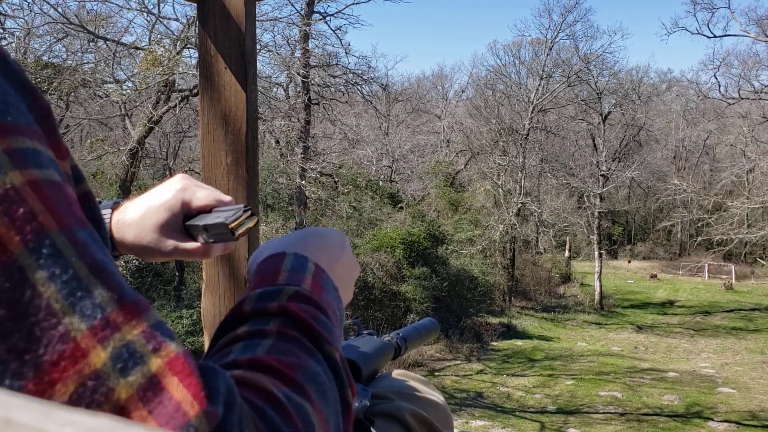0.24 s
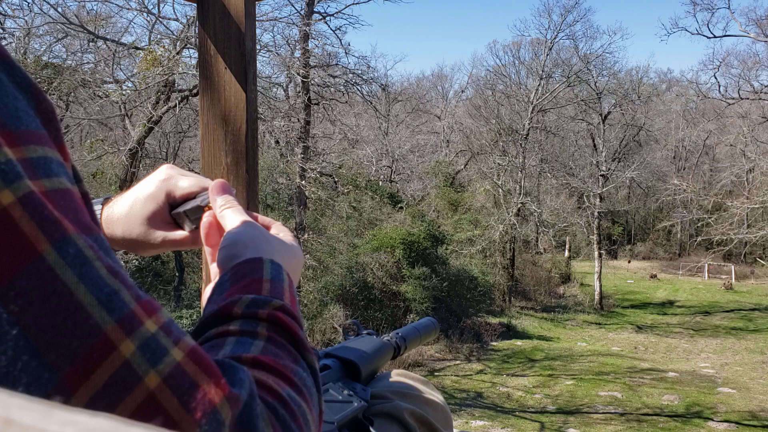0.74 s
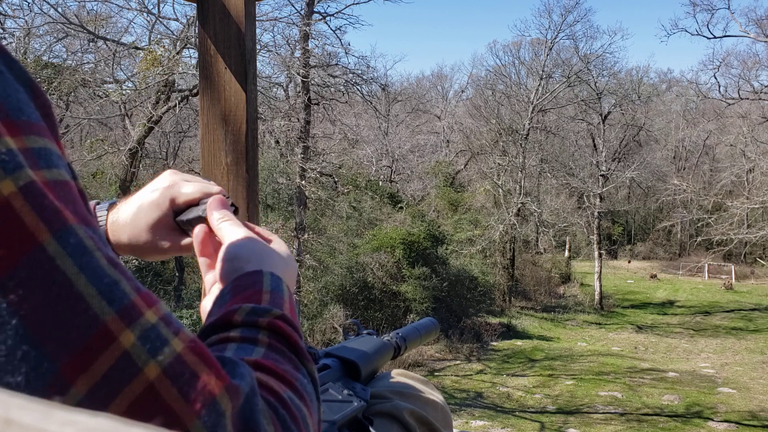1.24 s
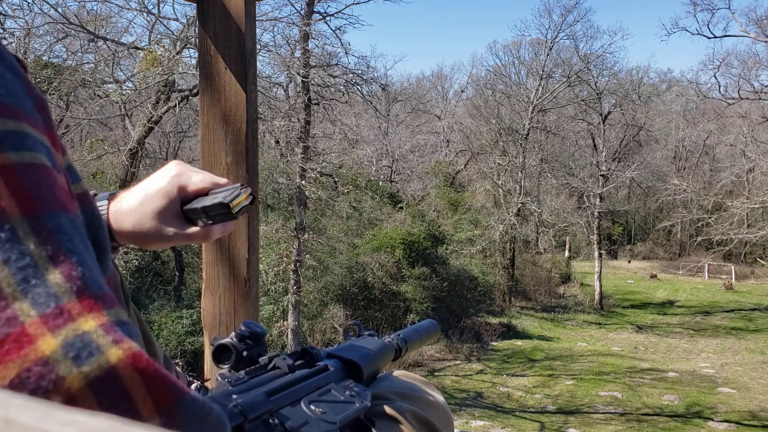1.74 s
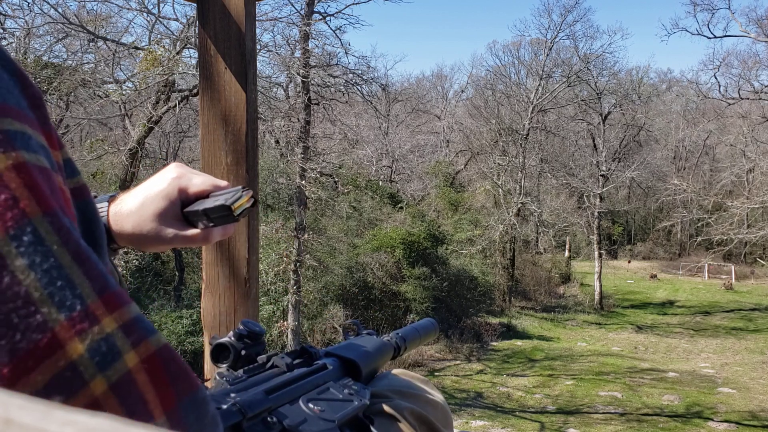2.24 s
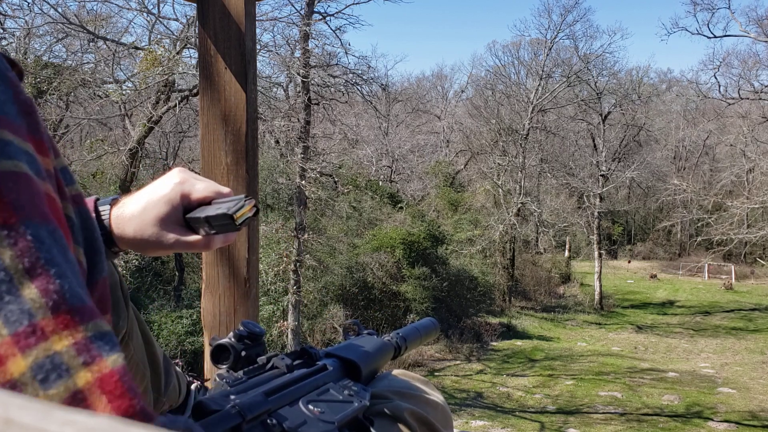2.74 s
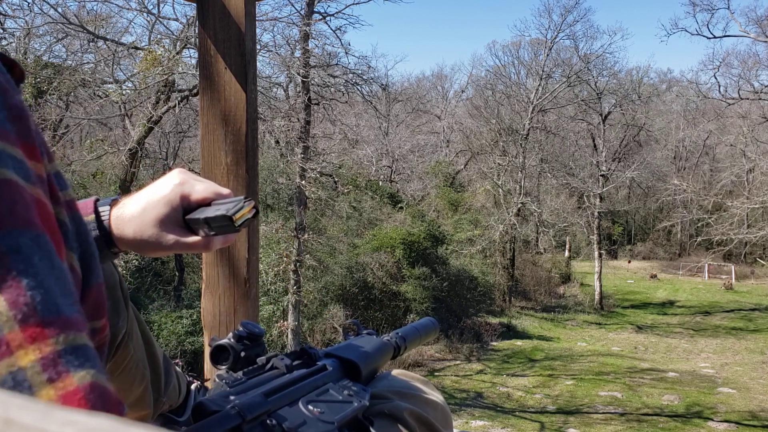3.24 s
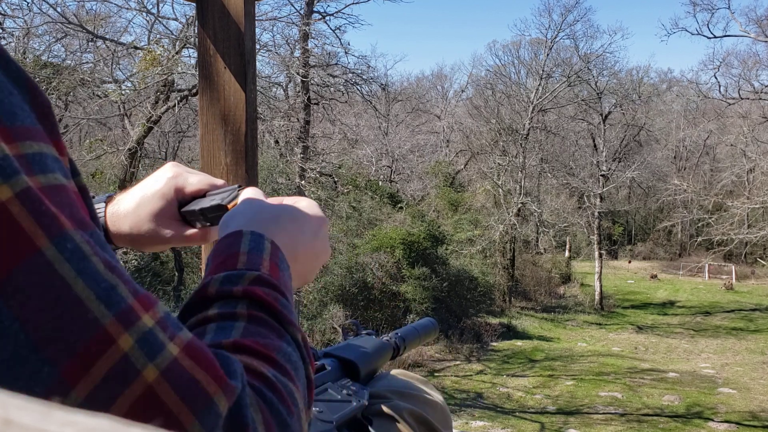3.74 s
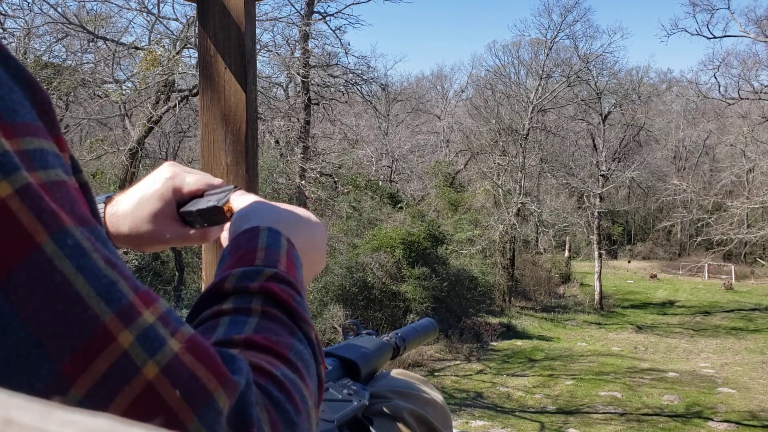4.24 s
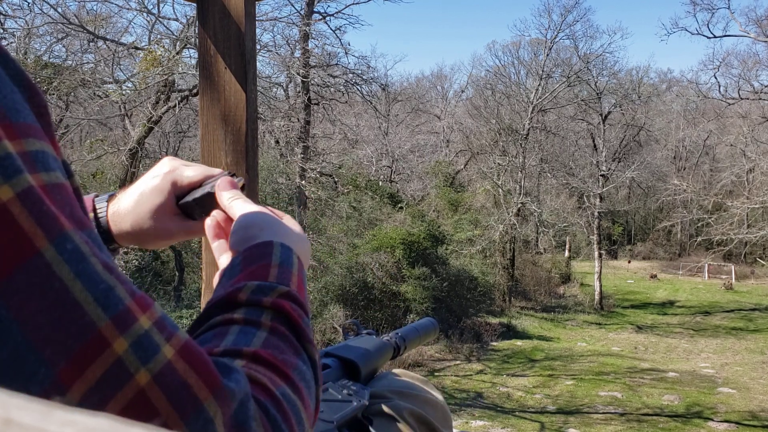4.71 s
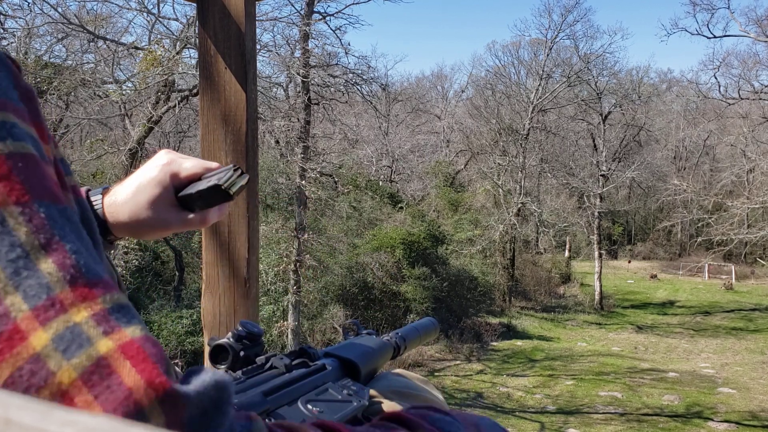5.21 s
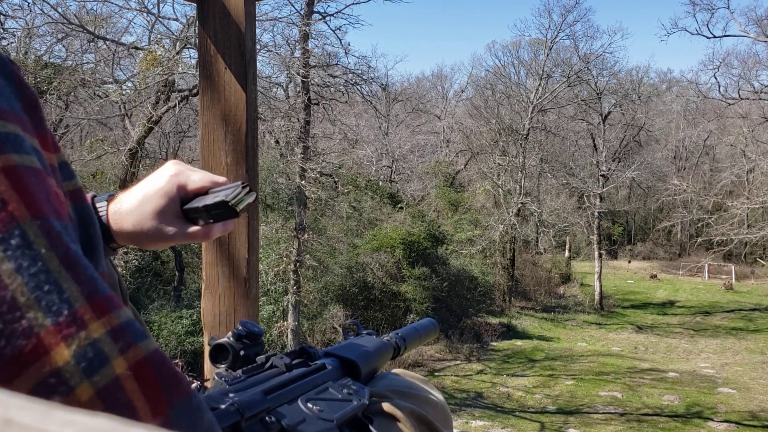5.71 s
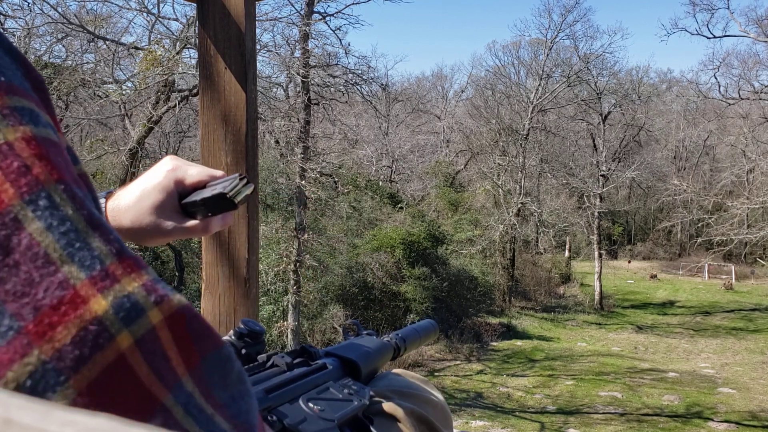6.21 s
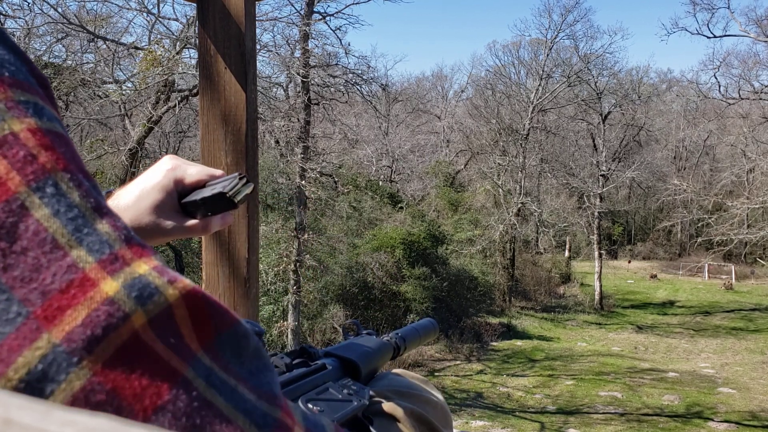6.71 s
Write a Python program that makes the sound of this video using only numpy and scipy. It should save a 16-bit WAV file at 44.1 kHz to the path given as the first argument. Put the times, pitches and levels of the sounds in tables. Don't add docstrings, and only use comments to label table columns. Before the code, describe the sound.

A close stereo outdoor scene, dry with only slight reflections from a post and trees. Low wind puffs flutter on the microphone, strongest in the first four seconds, over a faint wavering drone and leaf hiss. Small metallic clicks at 0.4 and 0.8 seconds lead to a sliding rub and a bright, hard snap with rapid bounces at 1.1. From 1.8 to 3.4 loose rounds knock in a hollow box, with a burst near 1.9 and the strongest clatter around 3.0, plus ticks, short scrapes and soft rustling. A crisp metal click comes at 3.6, lighter touches around 4.0, then a second seating snap at 4.77. Rummaging resumes from 5.5 to the end, with sharp knocks near 6.35 and small rattles at 6.8. A tiny high bird chips from the left about every second, clearest at 3.7 and 5.7.

```python
import sys
import numpy as np
from scipy import signal
from scipy.fft import rfft, irfft, next_fast_len
from scipy.io import wavfile
from scipy.ndimage import uniform_filter1d, map_coordinates

SR = 44100
rng = np.random.default_rng(int(sys.argv[2]) if len(sys.argv) > 2 else 0)


def makeup_ratio(level_db):
    decades = np.asarray(level_db, float) / 20
    return 10 ** decades


def file_out(sig):
    cols = np.atleast_2d(sig).T
    lim = np.clip(cols, -1, 1)
    pcm = np.round(lim * 32767).astype(np.int16)
    wavfile.write(sys.argv[1], SR, pcm)


N = 306832
LONG = next_fast_len(N + 2048)
BINS_HZ = np.fft.rfftfreq(LONG, 1 / SR)
LEFT_RIGHT = np.array([[1], [-1]])


def rms_one(x):
    return x / np.sqrt(np.mean(x ** 2) + 1e-20)


def in_time(rows):
    s, *columns = np.transpose(rows)
    return [np.interp(np.arange(N) / SR, s, c) for c in columns]


def at_hz(points, hz):
    points = np.array(points, float)
    return np.interp(np.log(hz), np.log(points[:, 0] + 1), points[:, 1])


def colour(x, spectrum):
    gain = makeup_ratio(at_hz(spectrum, BINS_HZ + 1))
    return irfft(rfft(x, LONG) * rms_one(gain), LONG)[..., :N]


def high_pass(x, hz):
    return signal.sosfilt(signal.butter(6, hz, "high", fs=SR, output="sos"), x)


def drift(rate):
    knots = rng.standard_normal(2000)
    steps = np.arange(0, N + 64, 64)
    return np.interp(np.arange(N), steps, map_coordinates(knots, [steps / SR * rate], order=2))


def swells(times, levels_db, rises_s, falls_s):
    steps = np.arange(0, N, 64)
    late = steps[:, None] / SR - times
    below = np.where(late > 0, late / falls_s, (late / rises_s) ** 2)
    power = makeup_ratio(2 * levels_db - 40 * below).sum(1)
    return np.interp(np.arange(N), steps, np.sqrt(power))


# time in seconds, peak in dB, length in seconds.
GUSTS = [(0.08, -60, 0.067), (0.421, -35, 0.036), (0.65, -46, 0.37), (0.899, -36, 0.062),
         (1.076, -49, 0.45), (1.32, -49, 0.087), (1.499, -44, 0.11), (1.697, -38, 0.1), (2.008, -35, 0.092),
         (2.32, -64, 0.27), (2.528, -41.5, 0.064), (2.698, -41.5, 0.23), (2.99, -39, 0.24),
         (3.33, -53.5, 0.24), (3.492, -53, 0.18), (3.665, -38, 0.041), (4.534, -59, 0.3),
         (4.836, -46, 0.054), (5.021, -54, 0.23), (5.29, -60, 0.11), (5.394, -49.5, 0.072),
         (5.465, -39.5, 0.084), (6.26, -69.5, 0.29), (6.694, -54, 0.28)]
GUST_RISE_SHARE, GUST_PAN_DB = 0.73, -3.5
# time in seconds, level in dB.
BREEZE = [
    (0, -49),
    (0.8, -48.5),
    (2.2, -43.5),
    (2.45, -57.5),
    (3.9, -55),
    (4.5, -64.5),
    (5.4, -54.5),
    (6.0, -61.5),
    (6.96, -62),
]
SHELTER_DB = -24
# frequency in Hz, density in dB per Hz.
BUFFET = [(12, -39.5), (20, -4), (70, 9), (89, 6.5), (192, -12.5), (263, -15), (288, -20), (320, -24),
          (420, -39.5), (700, -120)]


def wind():
    s, peak_db, length = np.transpose(GUSTS)
    gusts = swells(s, peak_db, GUST_RISE_SHARE * length, length) * makeup_ratio(.5 * GUST_PAN_DB * LEFT_RIGHT)
    breeze = makeup_ratio(in_time(BREEZE)[0] + 1.4 * drift(4.1) + [[SHELTER_DB], [0]])
    shared, *own = colour(rng.standard_normal((3, N)), BUFFET)
    ports = np.array(own) + 0.57 * shared
    even = ports / np.sqrt(uniform_filter1d(ports ** 2, size=2600) + 0.054)
    lumps = makeup_ratio(3 * np.array([drift(25), drift(25)]))
    return np.hypot(gusts, breeze) * rms_one(even * lumps)


# frequency in Hz, correlation from -1 to 1.
LIKENESS = [(60, 0.19), (180, 0.6), (550, 0.3), (1650, -0.52), (4970, 0.16), (15000, -0.29)]


def stereo_noise(spectrum):
    alike = np.clip(at_hz(LIKENESS, BINS_HZ + 1), -1, 1)
    mid, side = rfft(rng.standard_normal((2, LONG)))
    pair = np.sqrt((1 + alike) / 2) * mid + np.sqrt((1 - alike) / 2) * side * LEFT_RIGHT
    return colour(irfft(pair, LONG)[:, :N], spectrum)


def patchy(x, depth_db, rate):
    band = np.log(np.clip(BINS_HZ, 200, 16000) / 200) / np.log(80) * 10
    whole = rfft(x, LONG)
    out = 0
    for k in range(11):
        part = irfft(whole * np.clip(1 - abs(band - k), 0, 1), LONG)[:, :N]
        out = out + part * makeup_ratio(depth_db * drift(rate))
    return rms_one(out)


# time in seconds, level in dB.
DRONE = [
    (0.0, -64.5),
    (0.75, -58.5),
    (1.45, -67),
    (2.0, -63),
    (3.0, -64.5),
    (3.5, -63),
    (4.0, -71),
    (5.0, -71.5),
    (6.96, -71),
]
# frequency in Hz, density in dB per Hz.
DRONE_TONE = [(71, -32), (120, -10), (296, -12.5), (558, -10.5), (748, -13), (1230, -30.5), (1540, -30),
              (1750, -36.5), (2230, -41), (2500, -45.5), (3250, -78.5), (5500, -120)]
# frequency in Hz, density in dB per Hz.
AIR = [(470, -19.5), (800, -2), (1200, -3.5), (1990, -7), (2910, -13), (5080, -15), (6460, -10.5),
       (7400, -14.5), (8300, -28), (9300, -20.5), (10600, -17.5), (12300, -13.5), (15500, -15),
       (16500, -30)]
AIR_DB = -72.5


def woods():
    drone = makeup_ratio(in_time(DRONE)[0] + 1.2 + 1.5 * drift(9)) * stereo_noise(DRONE_TONE)
    leaves = makeup_ratio(.8 * drift(2.2)) * patchy(stereo_noise(AIR), depth_db=1.8, rate=11.0)
    return drone + makeup_ratio(AIR_DB) * leaves


def chatter(lengths_s, density):
    t = np.arange(1500) / SR
    draw = rng.random((len(lengths_s), 2, len(t)))
    hits = ((draw[:, 0] < density) + 0.045) * (2 * draw[:, 1] - 1)
    hits = hits * (1 - np.exp(-t / 0.00012)) * np.exp(-t / np.clip(lengths_s, 2e-4, .02)[:, None])
    return hits / np.sqrt(np.sum(hits ** 2, 1, keepdims=True))


def lay(times, levels_db, grains):
    out = np.full(N + len(grains[0]), 1e-18)
    for s, level_db, grain in zip(times, levels_db, grains):
        out[round(s * SR):][:len(grain)] += makeup_ratio(level_db) * grain
    return out[:N]


def ring(times, levels_db, lengths_s, modes, density, damping):
    out = 0
    for hz, level_db, t60 in modes:
        share_db = 1.5 * rng.standard_normal(len(times))
        clicks = lay(times, levels_db + level_db + share_db, chatter(lengths_s, density))
        t60_held = min(damping * t60, 0.024)
        r = makeup_ratio(-60 / (t60_held * SR))
        w = 2 * np.pi * hz / SR
        out = out + signal.lfilter([0, np.sin(w)], [1, -2 * r * np.cos(w), r * r], clicks)
    return out


def struck_spot(lengths_s, pitches_hz, t60):
    t = np.arange(1500) / SR
    rings = np.sin(2 * np.pi * pitches_hz[:, None] * t) * makeup_ratio(-60 * t / t60)
    touches = 0.79 * chatter(lengths_s, density=0.013) + 0.69 * (t == 20 / SR)
    return signal.fftconvolve(touches, rings, axes=1)


def place(x, phase):
    hz, radians = np.transpose(phase)
    turn = np.exp(-1j * np.interp(BINS_HZ, hz, radians))
    return np.array([x, irfft(rfft(x, LONG) * turn, LONG)[:N]])


def echoes(x, gap_s, t60, level_db):
    t = np.arange(SR // 2) / SR
    decay = makeup_ratio(level_db - 60 * t / t60) * np.clip(t / gap_s, 0, 1)
    tail = rng.standard_normal((2, len(t))) * decay
    return signal.fftconvolve(x[None], tail, axes=1)[:, :N]


# time in seconds, peak in dB, length in seconds, pitch in Hz.
SCRAPES = [(1.856, -58.5, 0.021, 2670), (1.887, -50, 0.017, 2660), (1.878, -51, 0.015, 4430),
           (1.916, -60, .04, 2820), (1.94, -67, .02, 2750), (2.144, -64, .04, 5300),
           (2.554, -58.5, 0.035, 2700), (2.69, -60.5, 0.068, 1140), (3.013, -51, 0.02, 2840),
           (5.505, -60, 0.076, 4200), (5.519, -56, 0.072, 2780), (5.523, -57, 0.036, 6250),
           (5.535, -58.5, .09, 1320), (5.648, -63, 0.037, 2700), (5.57, -60, 0.023, 2120),
           (5.717, -62, .015, 2230), (5.745, -51, 0.017, 990), (5.76, -56, 0.013, 3500),
           (6.113, -61.5, 0.077, 2800), (6.374, -44.5, 0.02, 2770), (6.38, -52, 0.012, 6460),
           (6.487, -56.5, 0.053, 3200), (6.808, -50.5, 0.034, 1900), (3.376, -60.5, 0.027, 1360),
           (3.349, -71, 0.047, 6500)]
SCRAPE_WIDTH_SHARE, SCRAPE_RISE_SHARE = .11, .4


def scrapes():
    out = np.zeros(N)
    t = np.arange(-2200, 8800) / SR
    for s, peak_db, length, hz in SCRAPES:
        grit = rng.standard_normal(len(t)) * makeup_ratio(4.8 * rng.standard_normal(len(t) // 100).repeat(100))
        edges_hz = hz * (1 + SCRAPE_WIDTH_SHARE * np.array([-.5, .5]))
        band = signal.butter(1, edges_hz, "band", fs=SR, output="sos")
        fade = makeup_ratio(peak_db - 20 * np.where(t > 0, t / length, (t / (SCRAPE_RISE_SHARE * length)) ** 2))
        part = out[round((s + t[0]) * SR):][:len(t)]
        part += (fade * rms_one(signal.sosfilt(band, grit)))[:len(part)]
    return out


# time in seconds, box in dB, tick re box in dB, pitch of the struck spot in Hz.
KNOCKS = [(1.883, -22.5, -5, 820), (1.909, -28, -14, 600), (1.992, -61.5, 12, 360),
          (2.309, -47.5, -29, 764), (2.607, -39, -22, 770), (2.626, -31.5, -8.5, 534),
          (2.671, -43, 1.5, 1144), (2.717, -44.5, -5, 1130), (2.756, -50.5, -3.5, 380),
          (2.807, -35.5, -8, 744), (2.956, -39, -41, 560), (2.972, -20, -8, 1365), (2.979, -18, -19, 452),
          (3.008, -31, -14, 427), (3.036, -31.5, -2.5, 316), (3.054, -31.5, -5, 560),
          (3.086, -28, -1.5, 760), (3.111, -37, -22, 1410), (3.14, -39.5, -8.5, 727),
          (3.371, -37.5, -25, 1375), (5.734, -60, 16, 1230), (6.061, -52.5, -4.5, 535),
          (6.106, -38, 6, 1330), (6.18, -40.5, 13, 548), (6.275, -43, 4, 550), (6.321, -37, 6, 590),
          (6.360, -23, -4, 1403), (6.379, -30.5, -2, 560), (6.486, -41, 12, 573), (6.722, -39.5, 4, 1240),
          (1.8874, -29.5, 0, 840), (1.893, -49, -9, 807), (1.969, -68.5, 10.5, 600), (2.645, -58, 6, 600),
          (2.698, -70, 7, 1100), (2.731, -70, 3, 600), (2.875, -66, 11, 600), (6.168, -62, 12, 600),
          (6.5683, -64, 9, 610), (6.828, -50, 12, 627), (6.853, -64, 14, 593), (6.908, -63.5, 9.5, 600)]
# time in seconds, box in dB, tick re box in dB, struck spot in Hz.
TUMBLES = [(0.197, -46.5, -16.5, 634), (1.833, -41, -27, 600), (1.858, -35, -34, 397),
           (1.8745, -25, -14, 723), (2.193, -56.5, -23, 496), (2.825, -36.5, -5.5, 547),
           (2.962, -18, -13, 1250), (3.015, -32, -5, 560), (3.096, -31.5, -8, 547),
           (5.495, -37.5, -30, 1043), (5.744, -38, -4, 1267), (6.252, -57.5, 7.5, 666),
           (6.345, -23, -9, 1230), (6.781, -36, -3, 1370), (6.819, -40, -3.5, 660),
           (6.923, -35.5, -0.5, 980)]
KNOCK_CHATTER_S, TUMBLE_CHATTER_S = 0.0046, 0.012
# frequency in Hz, level in dB, t60 in seconds.
BOX = [(501, -5, 0.081), (644, -14, 0.14), (750, 2.5, 0.042), (1003, 1.5, 0.098), (1050, 5, 0.0079),
       (1230, 3.5, 0.015), (1440, -3, 0.16)]
BOX_TILT_DB = -2.5
THUD_HZ, THUD_T60_S = 205, 0.027
# frequency in Hz, density in dB per Hz.
TICK = [(1060, -28), (1800, -11.5), (1900, 1.5), (2430, -5.5), (2820, 15.5), (3090, 1.5), (3440, 7),
        (4410, 12.5), (5390, 9.5), (7090, -37), (8060, -76), (13100, -43), (16000, -55)]
# frequency in Hz, density in dB per Hz.
CRACK = [(1000, -30), (1500, 1), (2500, -4.5), (6000, 5.5), (7400, -2.5), (8300, -18.5), (9500, -9.5),
         (13000, -10.5), (16000, -16.5)]
# time in seconds, peak in dB, rise and fall in seconds, each over 20 dB.
STIR = [(1.882, -61, 0.073, 0.18), (2.238, -73.5, 0.29, 0.17), (2.352, -69.5, 0.21, 0.13),
        (2.535, -68, 0.1, .25), (2.668, -66, 0.16, 0.17), (2.97, -73, 0.34, 0.11),
        (3.092, -62.5, 0.23, 0.11), (5.502, -65, 0.027, 1), (5.6, -68, 0.1, 0.11),
        (5.764, -68, 0.059, 0.11), (5.85, -93, 0.083, 0.053), (6.177, -61.5, 0.14, 0.033),
        (6.38, -65, 0.28, 0.042), (6.494, -64, 0.24, .07), (6.62, -65.5, 0.14, 0.94),
        (6.808, -61, 0.056, 0.045), (6.93, -64.5, 0.025, 0.035)]
# frequency in Hz, density in dB per Hz.
RUSTLE = [(150, -41.5), (250, -9), (348, -4.5), (414, -5.5), (566, -5), (775, -3), (922, -6), (1380, -3),
          (1850, -13), (2810, -5.5), (3230, -9.5), (7190, -13.5), (8260, -33), (9490, -18.5), (16000, -15)]
# frequency in Hz, left lead in radians.
BOX_PHASE = [(0, 2), (700, -1.2), (2400, -1), (16000, -12)]


def box():
    s, box_db, tick_db, spot_hz = np.transpose([*KNOCKS, *TUMBLES])
    length = np.repeat([KNOCK_CHATTER_S, TUMBLE_CHATTER_S], [len(KNOCKS), len(TUMBLES)])
    hollow = ring(s, box_db - 10.5, length, BOX[:3], density=0.032, damping=0.5)
    upper_db = box_db - 12.5 + BOX_TILT_DB * np.log2(spot_hz / 1000)
    hollow += ring(s, upper_db, length, BOX[3:], density=0.02, damping=0.31)
    hollow += lay(s, box_db - 2.5, struck_spot(length, spot_hz, t60=0.033))
    hollow = high_pass(hollow, 276.0)
    thud = ring(s, box_db - 13.5, length, [(THUD_HZ, 0, THUD_T60_S)], density=0.026, damping=0.91)
    thud = high_pass(thud, 54.0)
    ticks = lay(s, box_db + tick_db + 16.0, chatter(0.49 * length, density=0.34))
    ticks = colour(ticks, TICK) + 0.27 * colour(ticks, CRACK)

    stir = swells(*np.transpose(STIR))
    sizes = makeup_ratio(6.0 * np.minimum(rng.exponential(1, N), 3.2)) * rng.standard_normal(N)
    crackle = sizes * (rng.random(N) < .05 * makeup_ratio(6.0 * drift(40)))
    rustle = stir * makeup_ratio(3.5) * colour(rms_one(crackle), RUSTLE)
    wide = stir * makeup_ratio(7.0 + 2.76 * drift(35)) * patchy(stereo_noise(RUSTLE), depth_db=3.5, rate=30.0)
    near = place(hollow + thud + ticks + rustle + scrapes(), BOX_PHASE)
    return near + wide + echoes(hollow + ticks, gap_s=0.0039, t60=0.074, level_db=-39.5)


# time in seconds, walls in dB, body re walls in dB,
# brass re walls in dB, high re low wall modes in dB.
PRESSES = [(0.4264, -38, -6, -33, 1), (0.7622, -40.5, -11, -6, -2), (0.9471, -50.5, -3.5, -4, 0),
           (1.009, -55.5, -5, -9, 6), (1.2935, -59.5, -5, -21, 4.5), (2.2353, -44, -39.5, -11.5, 13.5),
           (3.4302, -57, -5.5, -1, 9), (3.574, -28, -30, 2, -6.5), (3.5804, -29.5, -18, 0.5, -3),
           (3.8048, -50, -17.5, 6, -9), (4.0012, -54, -5.5, -7.5, 1), (4.0109, -53, -2, -1.5, -2.5),
           (4.0658, -48, -5, -6.5, -4.5), (4.2495, -52, -25, -10, 2.5), (4.7376, -48.5, -8, 4.5, 5),
           (4.9008, -55.5, 0, -6.5, -1.5), (4.9133, -48, -1, -10, -1)]
# time in seconds, walls in dB, body
# re walls in dB, brass re walls in dB, chatter in seconds.
SLIDES = [
    (1.058, -42.5, -15.5, -16.5, 0.0044),
    (1.063, -37, 2, -12.5, 0.02),
    (1.083, -36.5, 4.5, -10, 0.0034),
    (1.113, -39.5, -2.5, -11, 0.0018),
    (4.752, -45.5, 6, -6, 0.0041),
    (4.7575, -29, -11.5, -2, .003),
    (4.798, -34, -18.5, 0.5, 0.001),
    (4.8127, -43.5, -2, -0.5, 0.003),
]
# time in seconds, walls in dB, body re walls in dB,
# brass re walls in dB, high re low wall modes in dB.
SEATS = [(1.0916, -25, -13.5, 7, 4.5), (1.0943, -11, -1, -4, 1), (1.0974, -16, 2.5, -6.5, 5.5),
         (1.1003, -19, -2, -4, 6), (1.103, -20.5, 0, -4.5, -0.5), (1.1065, -30, 0, -13, 0),
         (1.1105, -35, -1.5, -2, 2.5), (1.1165, -39.5, -1, -5, 2.5), (4.7665, -23, -12.5, 4.5, 5.5),
         (4.7697, -19, -1, 6.5, -2.5), (4.772, -15.5, -15, -2.5, -12.5), (4.7745, -17, -5.5, 0.5, -4.5),
         (4.7797, -31, -2, 1.5, -4), (4.7855, -35.5, 0.5, -6.5, 6), (3.587, -40, -20, 0, -1)]
PRESS_CHATTER_S, SEAT_CHATTER_S, SEAT_TILT_DB = 0.0035, 0.0014, 0


def contacts():
    rows = [(s, walls, body, brass, PRESS_CHATTER_S, tilt) for s, walls, body, brass, tilt in PRESSES]
    rows += [(*row, SEAT_TILT_DB) for row in SLIDES]
    rows += [(s, walls, body, brass, SEAT_CHATTER_S, tilt) for s, walls, body, brass, tilt in SEATS]
    return rows


# frequency in Hz, level in dB, t60 in seconds.
BODY = [(820, -21, .05), (1530, -6.5, 0.18), (2010, 1.5, 0.05), (2202, 1, 0.018)]
# frequency in Hz, level in dB, t60 in seconds.
WALLS = [(2980, -11.5, 0.028), (3500, -11.5, 0.064), (3650, -12.5, 0.035), (4360, -11.5, 0.078),
         (4300, -10.5, 0.03), (4696, -19, 0.085), (4643, -12, 0.074), (4930, -7, 0.066), (5260, -4.5, 0.06),
         (5870, -5, 0.027), (5420, 1, 0.019), (6686, -2.5, 0.056), (6600, -12, 0.097), (7660, -19.5, 0.047)]
# frequency in Hz, level in dB, t60 in seconds.
BRASS = [(9900, 0, 0.048), (10800, -15.5, 0.015), (9930, -5.5, 0.04), (12500, -19.5, 0.082),
         (11910, 4, 0.044), (14000, -4, 0.035), (13200, -14, 0.04), (14120, -9.5, 0.046),
         (14100, -20, 0.044), (14700, -3, 0.01), (13800, -0.5, 0.023), (15700, -16, 0.04)]
# frequency in Hz, left lead in radians.
HANDS_PHASE = [(0, 0), (2100, .9), (3000, 1.8), (4000, 2.0), (4900, 4.5), (7400, 3.0), (11500, 5.0),
               (16000, 6.3)]


def magazine():
    s, walls_db, body_db, brass_db, length, tilt_db = np.transpose(contacts())
    low_walls = [m for m in WALLS if m[0] < 4500]
    high_walls = [m for m in WALLS if m[0] >= 4500]
    body = high_pass(ring(s, walls_db + body_db - 4.0, length, BODY[1:], density=0.019, damping=0.86), 1500.0)
    body += high_pass(ring(s, walls_db + body_db - 1.5, length, BODY[:1], density=0.024, damping=0.7), 600.0)
    walls = ring(s, walls_db + 3.0 - .5 * tilt_db, length, low_walls, density=0.11, damping=0.43)
    walls += ring(s, walls_db - 3.5 + .5 * tilt_db, length, high_walls, density=0.28, damping=0.66)
    walls = high_pass(walls, 2000.0)
    brass = high_pass(ring(s, walls_db + brass_db + 4.0, length, BRASS, density=0.38, damping=0.033), 4500.0)
    scrape = .05 * chatter(5.0 * length, density=.12)
    touches = lay(s, walls_db + 11.5, chatter(1.6 * length, density=0.85) + scrape)
    crack = high_pass(colour(touches, CRACK), 1300.0)

    direct = body + walls + brass + crack
    near = place(direct, HANDS_PHASE)
    hands = echoes(direct, gap_s=0.00018, t60=.012, level_db=-25.5)
    soft = signal.butter(1, 5000.0, fs=SR, output="sos")
    dull = signal.sosfilt(soft, 0.25 * (body + walls + brass) + crack)
    return near + hands + echoes(dull, gap_s=.008, t60=0.27, level_db=-47.5)


# time in seconds, peak in dB, lowest pitch in Hz, left re right in dB.
CHIPS = [
    (0.5834, -50, 6250, 6),
    (2.5348, -51, 6100, 21),
    (3.706, -44, 5980, 7),
    (4.676, -46, 6040, 9.5),
    (5.6886, -43.5, 5800, 11),
    (6.454, -52, 6240, 18),
]
POST_ECHO_S, POST_ECHO_DB = .0066, -2.5


def bird():
    t = np.arange(600) / SR
    out = np.zeros((2, N))
    for s, level_db, low_hz, pan_db in CHIPS:
        pitch_hz = 8150 - (8150 - low_hz) * np.exp(-t / .0045)
        turn = 2 * np.pi * np.cumsum(pitch_hz) / SR
        shape = np.sin(np.pi * t / t[-1]) ** 1.1 * (np.exp(-t / .0017) + .007)
        call = shape * (np.sin(turn) + 0.069 * np.sin(2 * turn))
        times = s - .0015 + np.array([0, POST_ECHO_S])
        chip = lay(times, level_db + 13.0 + np.array([0, POST_ECHO_DB]), [call, call])
        out += chip * makeup_ratio(.5 * pan_db * LEFT_RIGHT)
    return out + echoes(out.mean(0), gap_s=.004, t60=.45, level_db=-34.5)


def scene():
    return wind() + woods() + box() + magazine() + bird()


def top_cut(x):
    return signal.sosfilt(signal.butter(12, 16780, fs=SR, output="sos"), x)


# frequency in Hz, left re right in dB.
PORTS = [(200, 0.5), (1300, 1.5), (2400, 0.5), (4400, 1), (8100, 5), (15000, 5.3)]


def record(dry):
    tilt = makeup_ratio(.5 * at_hz(PORTS, BINS_HZ + 1) * LEFT_RIGHT)
    ports = np.tanh(irfft(rfft(dry, LONG) * tilt, LONG)[:, :N])
    low_pass = signal.cheby2(12, 55, 16750, fs=SR, output="sos")
    return top_cut(signal.sosfilt(low_pass, ports))


dry = scene()
out = record(dry)
file_out(out)
```